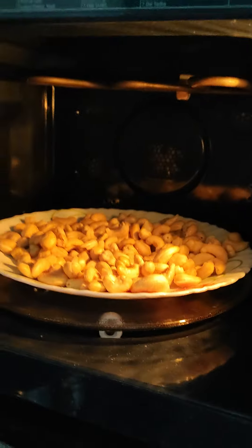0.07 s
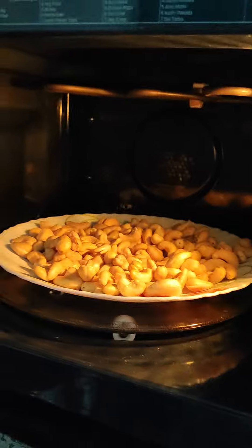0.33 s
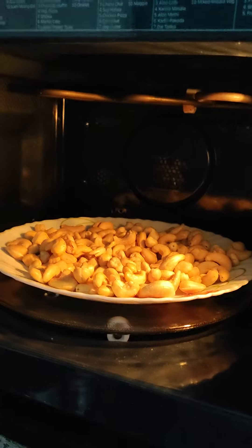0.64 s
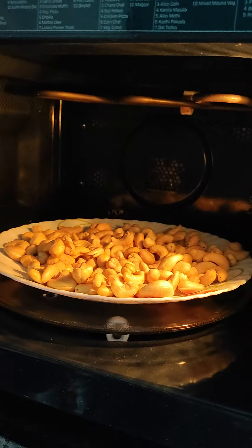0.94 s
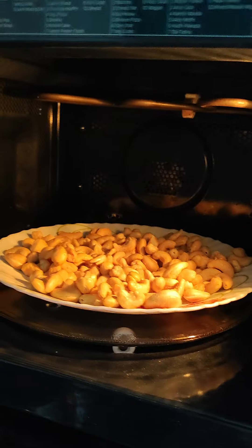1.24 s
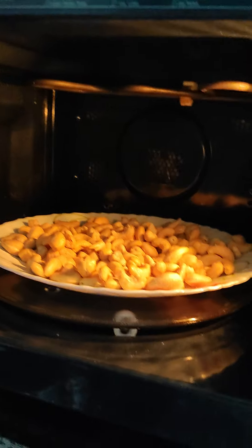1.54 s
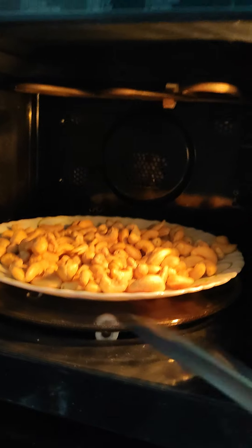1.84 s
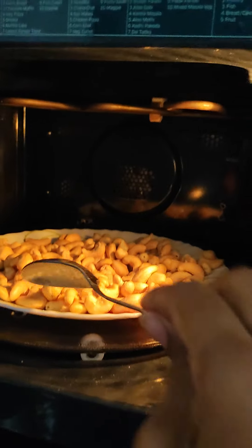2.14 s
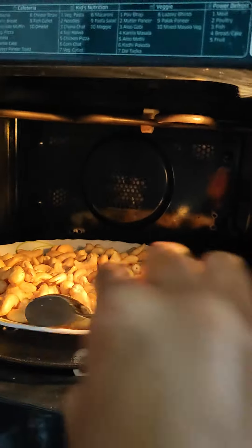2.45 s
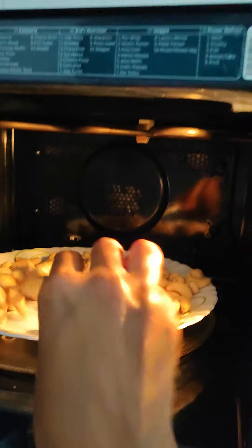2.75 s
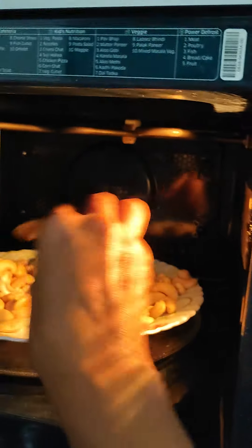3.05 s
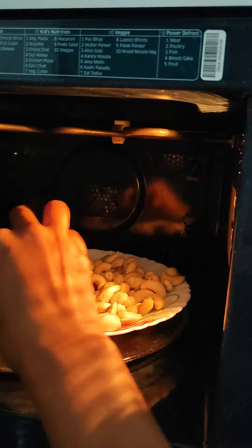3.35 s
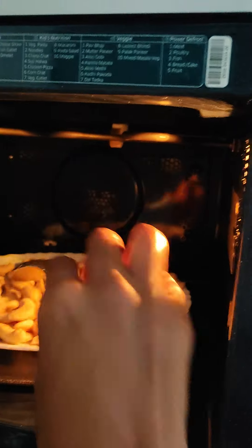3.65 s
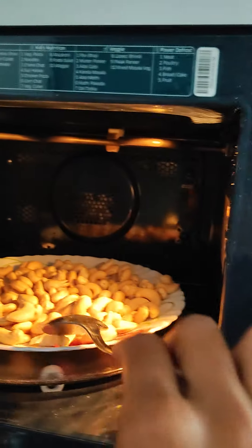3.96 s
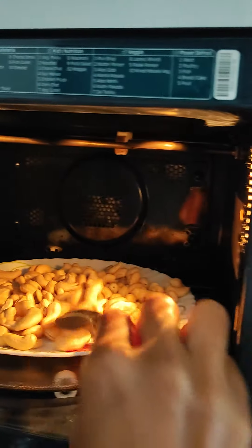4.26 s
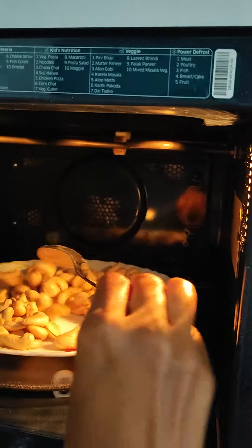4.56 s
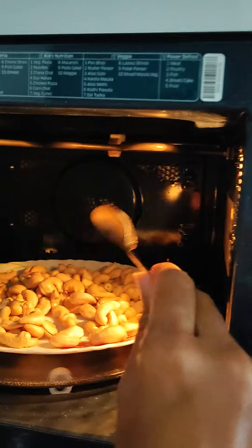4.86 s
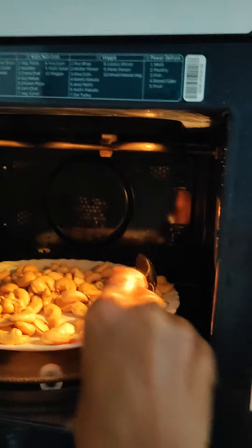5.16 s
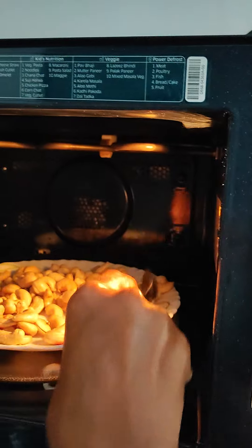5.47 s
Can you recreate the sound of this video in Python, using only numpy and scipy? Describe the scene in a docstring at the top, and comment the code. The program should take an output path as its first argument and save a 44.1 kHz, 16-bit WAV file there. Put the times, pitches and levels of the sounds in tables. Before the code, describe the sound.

A steel spoon stirs cashews on a ceramic plate inside an oven, with sharp clinks, rattles and knocks over a low hum.

```python
"""A steel spoon stirs roasted cashews on a ceramic plate inside an open countertop oven.
Over room air and a low mains hum come two small, bright clinks, then a faint, airy whistle.
The spoon strikes the plate and ploughs through the nuts: they rattle and snap, the steel rasps,
the plate rocks with dull thuds, and the metal cavity colours the clatter. A thin whine creeps
upward behind the softer stirring that follows, and dies as the hardest knock lands near the end."""
import sys
import numpy as np
from scipy import signal
from scipy.fft import rfft, irfft, next_fast_len
from scipy.io import wavfile
from scipy.ndimage import map_coordinates

SR = 44100
rng = np.random.default_rng(int(sys.argv[2]) if len(sys.argv) > 2 else 0)


def materialize(psi):
    """Save the field psi as 16-bit PCM at rate SR to the path in sys.argv[1].

    A 1-D psi becomes a single channel; in a 2-D psi each row is a channel.
    """
    bounded = np.clip(np.atleast_2d(psi).T, -1, 1)
    quanta = np.round(bounded * 32767).astype(np.int16)
    wavfile.write(sys.argv[1], SR, quanta)


N = 246959
TIME = np.arange(N) / SR
AGE = TIME[:SR // 3]  # seconds since the start of one contact

# spoon hits, bright if the contact is short: t/s, level/dB, contact/ms, steel over plate/dB
SPOON_HITS = [(1.8447, -14.5, 0.13, 6), (1.849, -21, 0.074, 9), (1.923, -31, 0.26, 6),
              (1.932, -33, 0.25, 3), (1.96, -26.5, 0.17, 5), (1.972, -31.5, 0.14, 8.5),
              (1.984, -38, 0.34, -5), (1.993, -39, 0.35, 2), (2.008, -32, 0.76, 9), (2.143, -37, 0.17, -3),
              (2.152, -35, 0.2, -3), (2.182, -27.5, 0.16, -16), (2.193, -41, 0.23, -6),
              (2.218, -42, 0.32, -4), (2.243, -39.5, 0.24, -2), (2.395, -46, 0.46, 1),
              (2.798, -39, 0.79, -7), (2.813, -34, 1, 4), (3.057, -36, 0.66, 0), (3.093, -45, 0.41, -4),
              (3.113, -39, 0.89, 0), (3.163, -42, 0.7, 0), (3.245, -42, 0.76, 0), (3.271, -50, 0.36, 15),
              (3.505, -41, 0.74, 4), (3.621, -33, 0.82, -3), (3.671, -48, 0.45, 6), (3.777, -32.5, 0.58, 8),
              (3.8116, -21.5, 0.24, 0), (3.8128, -28, 0.18, 2), (3.8375, -23.5, 0.26, -3),
              (3.866, -36, 0.25, 4), (3.908, -35.5, 0.4, -2), (3.928, -42, 0.58, -3), (3.953, -40, 0.6, 0),
              (3.985, -25.5, 1.03, 0), (4.13, -38.5, 0.55, 23.5), (4.167, -25.5, 0.89, 23),
              (4.192, -43.5, 0.35, 9), (4.209, -41.5, 0.3, -8), (4.228, -55, 0.3, 2),
              (5.0526, -12, 0.11, 1), (5.057, -9.5, 0.38, -13), (5.0607, -26, 0.065, 1),
              (5.062, -13, 0.61, 0), (5.084, -24, 1.4, 0), (5.11, -21, 0.82, 0), (5.1608, -30, 0.42, -4),
              (5.167, -33.5, 0.21, 4), (5.2168, -45.5, 0.044, 1.5), (5.308, -39, 0.68, 6),
              (5.3245, -32.5, 0.48, 11)]
# ring of the ceramic plate and of the steel spoon: f/Hz, level/dB, t60/s
PLATE_MODES = [(890, -10, .18), (1044, -9, .2), (1092, -7, .2), (1194, -3, .18), (1277, -3, .17),
               (1309, -4, .17), (1430, -5, .16), (1707, -10, .14), (1852, -5, .14), (1889, -2, .17),
               (2372, -3, .2), (2475, -2, .17), (2734, -8, .11), (3036, -10, .18), (3340, -12, .2),
               (3639, -9, .16), (3795, -10, .18), (4565, -9, .16), (4952, -12, .2), (5250, -12, .24),
               (5512, -12, .17), (6201, -15, .2), (7297, -16, .16), (8230, -15, .1), (8960, -17, .1)]
SPOON_MODES = [(3530, -5, .1), (3750, -7, .09), (4080, -3, .12), (4400, -6, .08), (6476, -7, .13),
               (6625, -3, .11), (7480, -9, .08), (8120, 0, .11), (8775, -4, .12), (9980, -14, .07),
               (11220, -8, .08), (11740, -14, .12), (14220, -15, .08)]
# the bright edge of an instant contact: f/Hz, level/dB
STEEL_EQ = [(500, 1.5), (1200, 0.5), (2100, 4), (3600, -2), (5000, 3.5), (8000, 9.5), (11500, 12),
            (15000, 19)]
# broad resonances of the loaded plate in the oven cavity: f/Hz, width/Hz, level/dB
CAVITY_PEAKS = [(580, 350, -14), (860, 150, -10), (1200, 170, -3), (1300, 110, -1), (1440, 90, -4),
                (1540, 110, -5), (1875, 140, -1), (2080, 220, -4), (2470, 200, -6), (2735, 220, -4.5),
                (3036, 100, -6), (3360, 140, -7), (3700, 280, -5), (4100, 170, -6), (4565, 240, -7),
                (4930, 150, -8), (5380, 280, -8), (6200, 240, -13), (6540, 330, -9), (7300, 180, -14),
                (7600, 200, -15), (8130, 330, -11), (8870, 330, -13), (9600, 520, -18), (11050, 380, -19),
                (11800, 520, -17), (12800, 1100, -21), (14100, 450, -21), (15400, 700, -22)]
# low body of the turntable and oven floor: f/Hz, level/dB
FLOOR_EQ = [(25, -50), (70, -24), (150, -7), (260, -10), (335, -2), (400, 0), (470, -6), (580, -12),
            (720, -15), (900, -19), (1500, -48)]
# pushes through the nuts: t/s, length/s, effort/dB, crisp rustle over rattle/dB
STIR_STROKES = [(1.861, 0.15, -56, 11.5), (1.956, 0.038, -42, 7), (1.986, 0.013, -45, 2),
                (2.054, 0.1, -55.5, 6), (2.13, 0.081, -45, 4), (2.163, 0.016, -53, 2),
                (2.274, 0.13, -59.5, -1), (2.788, 0.097, -63.5, -5), (2.917, 0.059, -63, 5.5),
                (2.998, 0.16, -56.5, 3), (3.196, 0.027, -68, -9), (3.615, 0.1, -61, -9),
                (3.613, 0.14, -58, 1.5), (3.765, 0.029, -54, -1), (3.834, 0.092, -43, -2),
                (4.153, 0.072, -52, -13), (4.958, 0.078, -64, 4.5), (5.061, 0.11, -48, 7.5),
                (5.213, 0.019, -57.5, 9.5)]
# the spoon's bowl slides over the nuts: t/s, length/s, level/dB
SPOON_SLIDES = [(1.861, 0.17, -48.5), (2.133, 0.081, -55.5), (3.013, 0.15, -65), (3.804, .11, -56.5),
                (5.07, .1, -53)]
# the fine sizzle of those slides: f/Hz, level/dB
RASP_EQ = [(5000, -32), (8000, -29), (9300, 0), (10300, -10.5), (11500, 3), (12800, -4.5), (14200, -5),
           (15600, -9)]
# the plate rocks on the turntable: t/s, level/dB
PLATE_NUDGES = [(2.006, -32.5), (2.119, -33), (2.30, -36), (2.418, -40.5), (2.791, -42), (2.944, -59),
                (3.048, -63), (3.125, -47), (3.179, -60), (3.503, -41.5), (3.773, -37.5), (3.829, -38.5),
                (4.994, -41), (5.083, -35.5), (5.113, -33.5), (5.15, -29), (5.209, -41), (5.41, -42.5),
                (5.519, -41.5)]
# cutlery touches: t/s, level/dB, contact/ms, tick over ring/dB, tick t60/s, second piece's share/0-1
CUTLERY_TOUCHES = [(0.66, -54.5, 0.11, -1.5, 0.22, 0), (0.707, -26.5, 0.31, -19.5, 0.069, 0.5),
                   (.708, -47, 0.046, -6, .06, 0), (.715, -43, 0.082, 0, 0.097, 0.4),
                   (0.7282, -29, 0.036, 1, 0.028, 0.3), (0.733, -29, 0.043, 1.5, 0.027, 0.14),
                   (.7365, -46, .04, 7, 0.021, 0.4), (.806, -50, 0.29, 2, 0.055, 0.6),
                   (0.8194, -37, 0.29, -2, 0.015, 1), (0.8299, -27.5, 0.062, -0.5, 0.059, 0.87),
                   (.831, -44.5, 1.7, -2, 0.22, 1), (.842, -31, 0.29, -9, 0.099, 1)]
# ring of the two pieces that clink: f/Hz, level/dB, t60/s
FIRST_PIECE_MODES = [(2510, -17, .12), (3984, -12, .08), (4829, -11, .13), (5351, -16, .3), (6175, -7, .16),
                     (7100, -15, .2), (8888, -8, .2), (9125, -11, .13), (10890, -2, .2), (11350, -7, .12),
                     (12080, -6, .14), (12310, -4, .26), (12980, -12, .12), (14220, 0, .15),
                     (14970, 0, .18), (15200, -3, .22)]
SECOND_PIECE_MODES = [(2169, -20, .34), (3161, -12, .12), (3210, -9, .18), (3985, -20, .25),
                      (5066, -14, .22), (5200, -14, .14), (6089, -19, .4), (6990, -19, .3),
                      (7079, -19, .42), (7887, -16, .26), (8510, -16, .2), (9426, -3, .25),
                      (10680, -7, .09), (10990, -5, .22), (12110, -15, .25), (14200, -9, .27),
                      (14820, -6, .12), (15040, -6, .15)]
# the tick on top of a clink: f/Hz, level/dB
TICK_EQ = [(500, -21.5), (1500, -10), (3000, -6.5), (5200, -6.5), (5650, -16), (6200, -2), (7500, -11),
           (9000, 9.5), (10100, -30), (11000, 8), (12300, -6), (13400, -20), (14300, 5), (15600, -8)]
# room air: f/Hz, level/dB
AIR_EQ = [(20, -10), (48, -5), (107, -3), (220, -9.5), (285, -11), (420, -16), (600, -19.5), (1290, -23.5),
          (2300, -29), (3800, -26.5), (5300, -30), (7000, -39), (10200, -40), (12000, -36), (15700, -31.5)]
# tones of the mains hum: f/Hz, level/dB
HUM_TONES = [(102.3, -57.5), (301.5, -68), (441.4, -69.5)]
# stereo image, narrow in the bass and wide on top: f/Hz, left-right likeness/0-1
STEREO_LIKENESS = [(25, .62), (70, .97), (150, .83), (330, .92), (640, 0.25), (1400, 0.05), (6000, 0.03)]
# the kitchen's reverb tail: f/Hz, t60/s
KITCHEN_DECAY = [(150, 0.7), (400, 1), (2000, 0.32), (6000, 0.45), (14000, 0.13)]

STROKE_SPOT_DB = 3  # how much the cavity peaks vary from spot to spot while stirring


def knocks(firm_db=-30, spoon_db=-6.5, steel_from_hz=3200):
    """Spoon meets plate: clatter builds in the cavity, plate and spoon ring, the oven floor thuds."""
    out = np.zeros((2, N))
    for s, db, contact_ms, steel_db in SPOON_HITS:
        hardness = lambda hz: eq(STEEL_EQ, hz) * softened(hz, contact_ms)
        steel_shelf = lambda hz: amp(steel_db * (1 - 1 / (1 + (hz / steel_from_hz) ** 10)))
        clatter = filtered(noise(cavity, len(AGE)), lambda hz: hardness(hz) * steel_shelf(hz))
        clatter *= fade(t60=0.045)
        tone = ring(PLATE_MODES, hardness) + amp(spoon_db + steel_db) * ring(SPOON_MODES, hardness)
        force_db = db - firm_db  # harder hits carry a touch more ring and much more thud
        tone *= amp(-13 + 0.0464 * force_db)
        low = amp(-25.5 + 0.3656 * force_db) * thud(build_s=0.0045, t60=0.22)
        add(out, s, amp(db) * ((clatter + tone) * rise(build_s=0.0015) + low))
    return out


def nuts(steady_db=-50, collisions_per_s=360, split_hz=3200, crunch_share=0.55):
    """Nuts jostle ahead of the spoon: a swarm of tiny collisions, with single snaps on top."""
    lows = lambda hz: 1 / np.sqrt(1 + (hz / split_hz) ** 10)
    hollow = lambda hz: eq([(800, 0.016), (1150, 1), (1700, 0)], hz)
    colours = [oven_floor,
               lambda hz: cavity(hz, STROKE_SPOT_DB) * hollow(hz) * lows(hz),
               lambda hz: cavity(hz, STROKE_SPOT_DB) * np.sqrt(1 - lows(hz) ** 2)]
    out, n = np.zeros((2, N)), len(AGE)
    for s, length, db, crisp_db in STIR_STROKES:
        push_db = db - steady_db
        rate = collisions_per_s * amp(0.1 * push_db)  # more effort, more collisions
        sizes = amp(0.5 * np.minimum(rng.exponential(size=n), 3)) * rng.choice([-1, 1], n)
        hits = (rng.random(n) < rate / SR) * sizes
        spot = reflections(t60=0.069) + amp(-20) * ring(PLATE_MODES, lambda hz: eq(STEEL_EQ, hz))
        swarm = excite(hits, spot)
        rumble, rattle, rustle = [spread(swarm, colour) for colour in colours]
        wash = np.sqrt(1 - crunch_share) * (rattle + amp(crisp_db) * rustle)
        clacks = np.sqrt(crunch_share) * np.hypot(1, amp(crisp_db)) * crunch(crisp_db)
        drag = amp(-55 + 0.02 * push_db) * rumble  # plate on turntable: barely grows with effort
        stroke = drag + amp(db) * (wash + clacks)
        # the spoon gathers speed; the nuts settle after it
        add(out, s, stroke * swell(AGE, length, attack_s=0.22 * length, release_t60=0.19))
    return out


def crunch(crisp_db, spots=3, snaps_per_s=170):
    """Nuts snap at several spots of the plate, so the colour of the clatter keeps shifting."""
    return unit(sum(snaps(crisp_db, snaps_per_s / spots) for _ in range(spots)))


def snaps(crisp_db, per_s, base_hz=3100, scatter_oct=0.55, scatter_db=3.5):
    """Single nuts snap past the spoon at one spot: short clacks that ring plate and cavity."""
    n, t = len(AGE), AGE[:SR // 50]
    count = int(per_s * n / SR)
    starts = ((np.arange(count) + rng.random(count)) * n / count).astype(int)
    octaves = 0.08 * crisp_db + scatter_oct * rng.standard_normal((count, 1))  # crisper is higher
    hz = base_hz * 2 ** octaves
    sizes = amp(scatter_db * np.minimum(rng.exponential(size=(count, 1)), 2))
    clacks = sizes * np.sin(2 * np.pi * hz * t) * fade(t60=0.0016)[:len(t)]
    positions = starts[:, None] + np.arange(len(t))
    train = np.bincount(positions.ravel(), clacks.ravel(), n)[:n]
    spot = reflections(t60=0.022) + amp(-24) * ring(PLATE_MODES, np.ones_like)
    return spread(excite(train, spot), lambda f: cavity(f, STROKE_SPOT_DB))


def rasps(slips_per_s=500):
    """The spoon's bowl sticks and slips on the nuts: tiny, bright ticks, echoed by the cavity."""
    out, n = np.zeros((2, N)), len(AGE)
    for s, length, db in SPOON_SLIDES:
        slips = (rng.random(n) < slips_per_s / SR) * rng.uniform(-1, 1, n)
        echoed = excite(slips, reflections(t60=0.03))
        sizzle = spread(echoed, lambda hz: eq(RASP_EQ, hz))
        add(out, s, amp(db) * sizzle * swell(AGE, length, attack_s=0.012, release_t60=0.16))
    return out


def clinks(build_s=0.00039, free_share=0.36, pan_db=1.2):
    """Cutlery touches, a little to the left: a bright tick and a thin ring that the hand damps."""
    out = np.zeros((2, N))
    grip = free_share + (1 - free_share) * fade(t60=0.07)
    attack = 1 - np.exp(-AGE / build_s)
    for s, db, contact_ms, tick_db, t60, share in CUTLERY_TOUCHES:
        hardness = lambda hz: softened(hz, contact_ms)
        first, second = ring(FIRST_PIECE_MODES, hardness), ring(SECOND_PIECE_MODES, hardness)
        tone = grip * ((1 - share) * first + share * second)
        tick = amp(tick_db) * noise(lambda hz: eq(TICK_EQ, hz) * hardness(hz), len(AGE)) * fade(t60)
        add(out, s, amp(db) * (tone + tick) * attack)
    return out * amp([[pan_db], [-pan_db]])


def nudges():
    """Pushed by the spoon, the plate rocks softly on the turntable."""
    out = np.zeros((2, N))
    for s, db in PLATE_NUDGES:
        add(out, s, amp(db) * thud(build_s=0.0071, t60=0.17))
    return out


def bump(hz=42.7, db=-33, pan_db=3):
    """The oven body rocks under the first knock: one short sub-bass sway, leaning right."""
    out = np.zeros((2, N))
    sway = np.sin(2 * np.pi * hz * AGE) * fade(t60=0.067)
    add(out, SPOON_HITS[0][0], amp([[db - pan_db], [db + pan_db]]) * sway)
    return out


def ring(modes, colour, beat_depth=0.76, beat_hz=28):
    """A struck body's modes beat and decay, each at its own strength left and right."""
    size = np.sqrt(sum(amp(db) ** 2 for _, db, _ in modes) / 2)
    out = np.zeros((2, len(AGE)))
    for hz, db, t60 in modes:
        gain = amp(db + 2 * rng.standard_normal((2, 1))) * colour(hz)
        tone = sine(hz)
        beating = 1 + beat_depth * sine(beat_hz * (0.5 + rng.random()))
        out += gain * fade(t60) * tone * beating
    return out / size


def softened(hz, contact_ms, order=3.7):
    """Low-pass of a contact: it cannot excite much above 1 / its duration."""
    corner_hz = 1000 / contact_ms
    return 1 / np.sqrt(1 + (hz / corner_hz) ** (2 * order))


def cavity(hz, spot_db=1.5):
    """Colour of plate and cavity: each spot on the plate favours other resonances."""
    peaks = (amp(db + spot_db * rng.standard_normal()) / (1 + 2 * ((hz - f) / width) ** 2)
             for f, width, db in CAVITY_PEAKS)
    return np.sqrt(sum(peak ** 2 for peak in peaks))


def reflections(t60):
    """The cavity's dense echoes: a dying burst of stereo noise."""
    return rng.standard_normal((2, len(AGE))) * fade(t60)


def thud(build_s, t60):
    """One dull answer of the turntable and oven floor."""
    return noise(oven_floor, len(AGE)) * fade(t60) * rise(build_s)


def oven_floor(hz):
    """Colour of the turntable and oven floor under the plate."""
    return eq(FLOOR_EQ, hz)


def kitchen(send):
    """The room's reverb: each frequency dies at its own speed."""
    hz, t, spectrum = signal.stft(noise(np.ones_like, SR * 3 // 4), SR, nperseg=256)
    decay = np.exp(-np.log(1000) * t / along(KITCHEN_DECAY, hz)[:, None])
    _, tail = signal.istft(spectrum * decay, SR, nperseg=256)
    return signal.fftconvolve(send, tail / np.linalg.norm(tail[0]), axes=1)[:, :N]


def whistle(start_s=1.17, hz=3685, width_hz=40):
    """A faint, airy tone that swells and is gone."""
    level = amp(-66) * swell(TIME - start_s, length=0.26, attack_s=0.081, release_t60=0.26)
    return level * noise(lambda f: 1 / (1 + ((f - hz) / width_hz) ** 2), N)


def whine(start_s=2.5, start_hz=8970, rise_hz_per_s=310, waver_hz=22, fade_db_per_s=1.2):
    """A thin, wavering pair of tones, a fifth apart, that creeps upward as it fades."""
    t = TIME - start_s
    hz = start_hz + rise_hz_per_s * t + waver_hz * wobble(28)
    phase = 2 * np.pi * np.cumsum(hz) / SR
    level = amp(-77.5 - fade_db_per_s * t - 5 * wobble(2.27))
    level *= swell(t, length=2.4, attack_s=0.17, release_t60=0.6)
    return level * (np.sin(phase) + amp(-1) * np.sin(phase * 3 / 2))


def mains_hum(sway_db=2, drift_rad=0.33):
    """Low mains hum, each tone slightly unsteady in level and phase."""
    hum = np.zeros(N)
    for hz, db in HUM_TONES:
        level = np.sqrt(2) * amp(db + sway_db * wobble(3.84))
        hum += level * np.sin(2 * np.pi * hz * TIME + drift_rad * wobble(10))
    return hum


def room_air(db=-51, sway_db=0.64):
    """A soft, dark bed of noise that barely breathes."""
    return noise(lambda hz: eq(AIR_EQ, hz), N) * amp(db + sway_db * wobble(5.7))


def amp(db):
    """Decibels to gain."""
    return 10 ** (np.asarray(db) / 20)


def unit(x):
    """x at rms 1."""
    return x / np.sqrt(np.mean(x ** 2) + 1e-20)


def along(points, hz):
    """A curve of (f/Hz, value) points, read on a log axis."""
    freqs, values = np.transpose(points)
    return np.interp(np.log(hz + 1), np.log(freqs + 1), values)


def eq(points, hz):
    """Gain of an EQ curve of (f/Hz, level/dB) points."""
    return amp(along(points, hz))


def rise(build_s):
    """Attack of a contact, as reflections pile up in the cavity."""
    return (1 - np.exp(-AGE / build_s)) ** 2


def fade(t60):
    """Free decay, 60 dB down after t60 seconds."""
    return np.exp(-np.log(1000) * AGE / t60)


def swell(t, length, attack_s, release_t60):
    """Ramp up, hold until length seconds, then die away."""
    release = np.exp(-np.log(1000) * np.maximum(t - length, 0) / release_t60)
    return np.clip(t / attack_s, 0, 1) * release


def wobble(rate):
    """A smooth random curve, rate knots a second."""
    return map_coordinates(rng.standard_normal(int(N * rate / SR) + 4), [TIME * rate])


def sine(hz):
    """A tone with a random phase on each side."""
    return np.sin(2 * np.pi * (hz * AGE + rng.random((2, 1))))


def noise(colour, size):
    """Coloured stereo noise of rms 1."""
    return spread(rng.standard_normal((2, size)), colour)


def spread(pair, colour):
    """Two unrelated signals become a coloured left and right of rms 1, alike in the bass only."""
    def mid_side(hz):
        angle = np.arccos(np.clip(along(STEREO_LIKENESS, hz), -1, 1)) / 2
        return colour(hz) * np.array([np.cos(angle), np.sin(angle)])
    mid, side = filtered(pair, mid_side)
    return unit(np.array([mid + side, mid - side]))


def filtered(x, response):
    """x shaped by a gain over frequency."""
    n = x.shape[-1]
    padded = next_fast_len(n + 8192)
    hz = np.fft.rfftfreq(padded, 1 / SR)
    return irfft(rfft(x, padded) * response(hz), padded)[..., :n]


def excite(hits, response):
    """Play a mono train of hits through a stereo impulse response."""
    return signal.fftconvolve(hits[None], response, axes=1)[:, :len(hits)]


def add(track, s, sound):
    """Lay a sound into a track at s seconds."""
    part = track[:, round(s * SR):][:, :sound.shape[1]]
    part += sound[:, :part.shape[1]]


def scene():
    """The mix: hits, clinks and stirring, each with its reverb send, over the background bed."""
    hits = knocks()
    cutlery = clinks()
    stir = nuts() + rasps() + nudges()
    reverb = kitchen(amp(-14.5) * hits + amp(-10) * cutlery + amp(-12) * stir)
    bed = room_air() + mains_hum() + whine() + whistle()
    return hits + bump() + cutlery + stir + reverb + bed


def record(dry, top_hz=15850):
    """A brick-wall low-pass takes off the very top."""
    return filtered(dry, lambda hz: 1 / np.sqrt(1 + (hz / top_hz) ** 160))


dry = scene()
out = record(dry)
materialize(out)
```